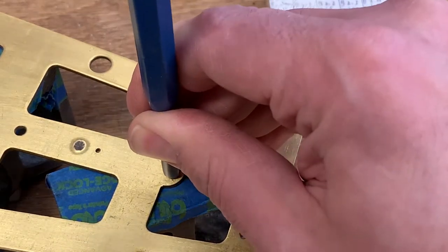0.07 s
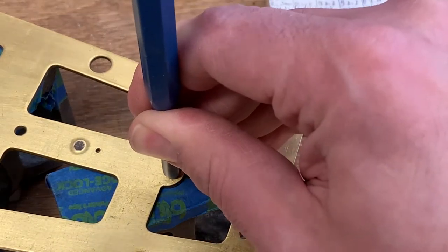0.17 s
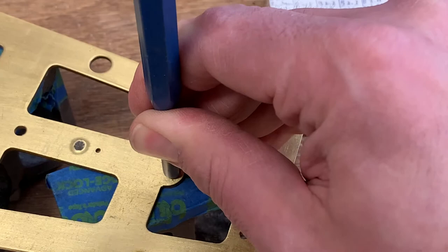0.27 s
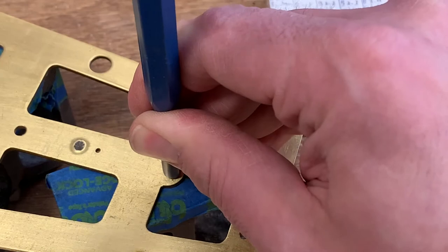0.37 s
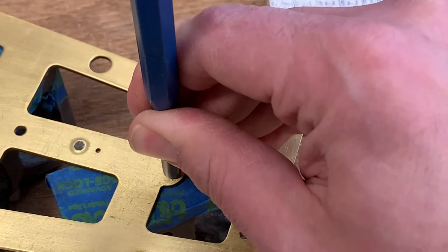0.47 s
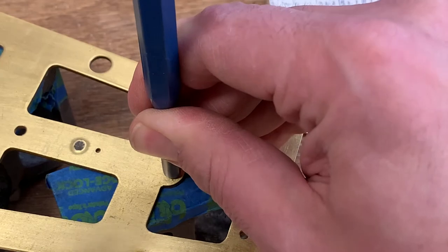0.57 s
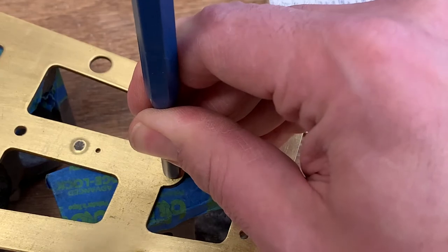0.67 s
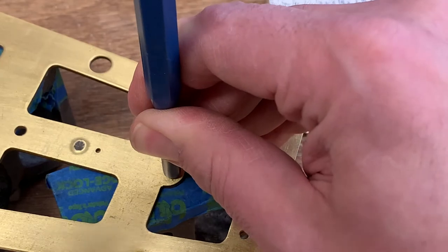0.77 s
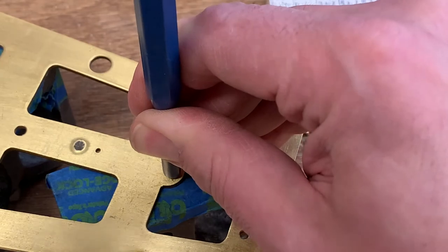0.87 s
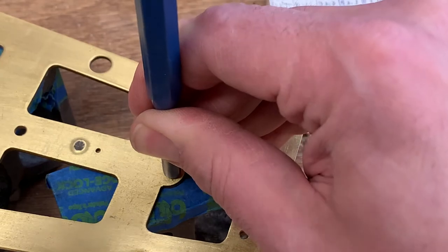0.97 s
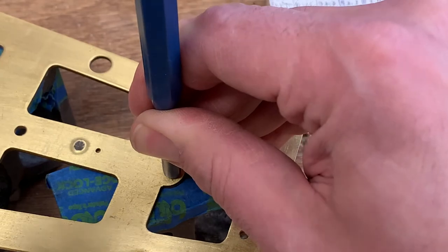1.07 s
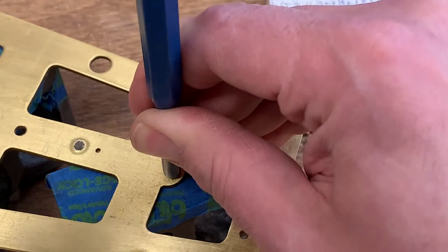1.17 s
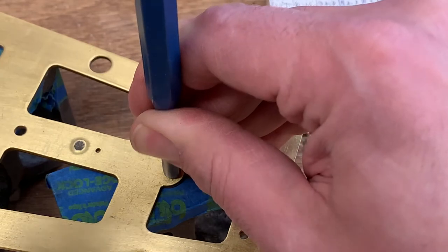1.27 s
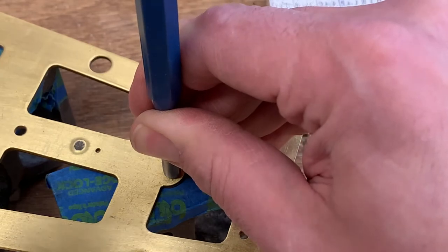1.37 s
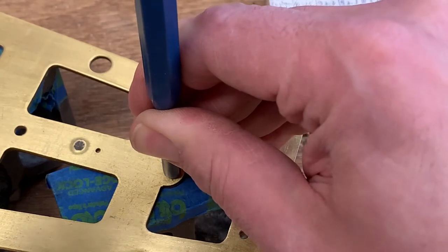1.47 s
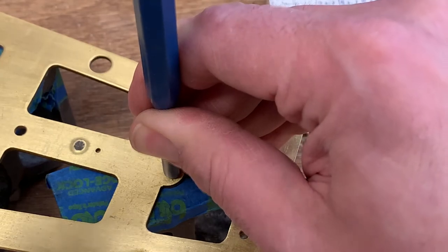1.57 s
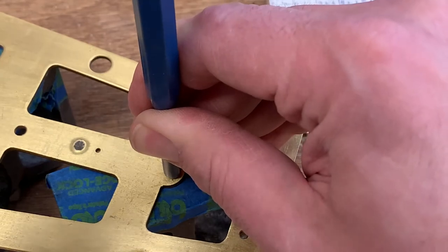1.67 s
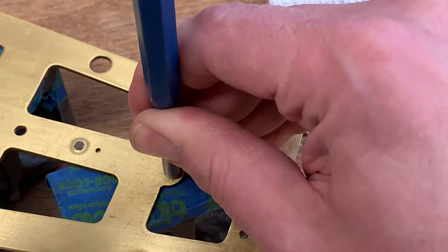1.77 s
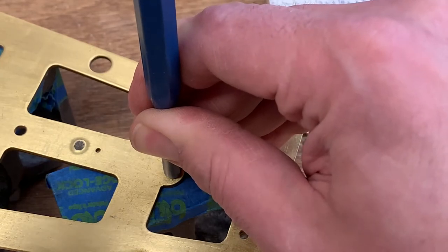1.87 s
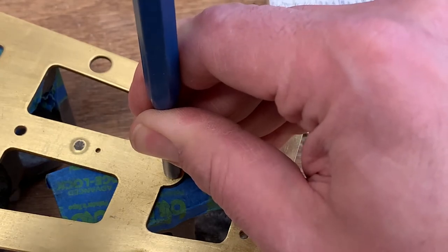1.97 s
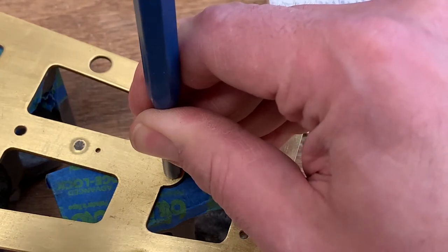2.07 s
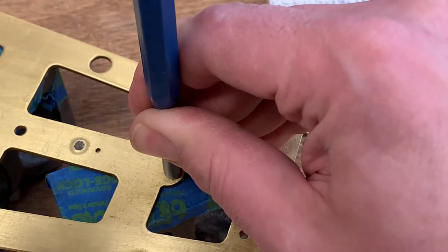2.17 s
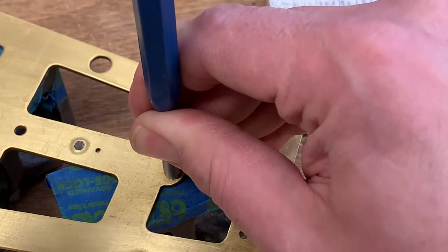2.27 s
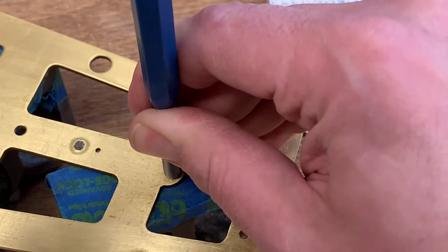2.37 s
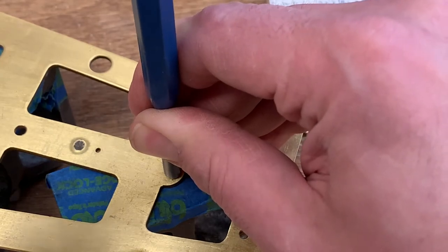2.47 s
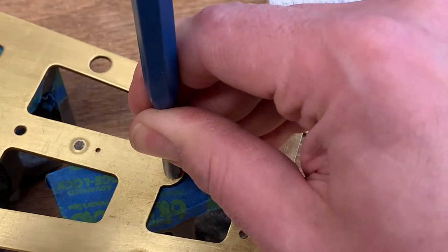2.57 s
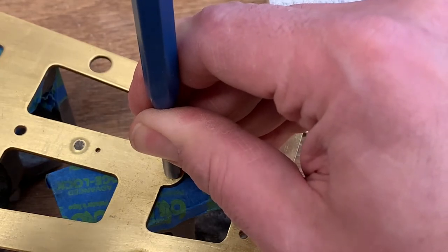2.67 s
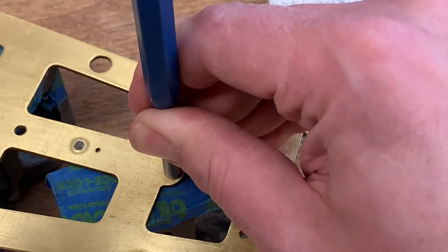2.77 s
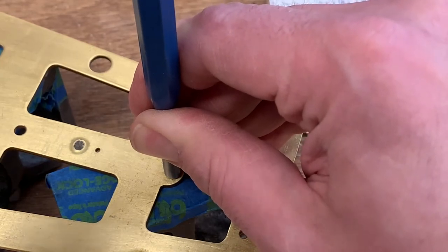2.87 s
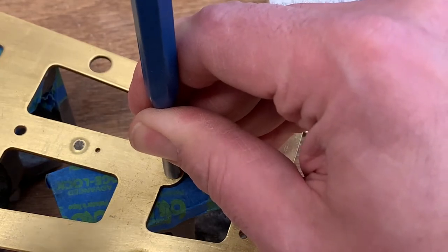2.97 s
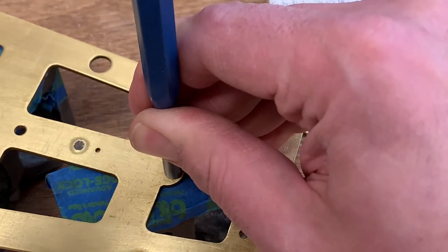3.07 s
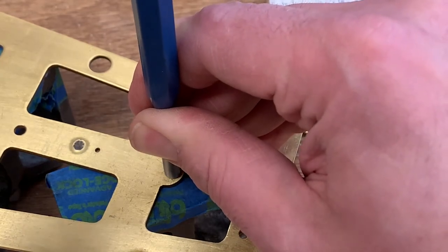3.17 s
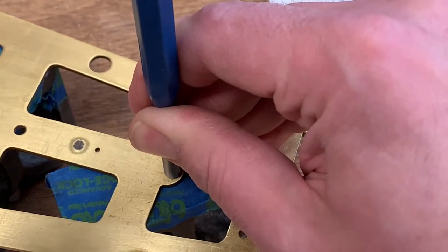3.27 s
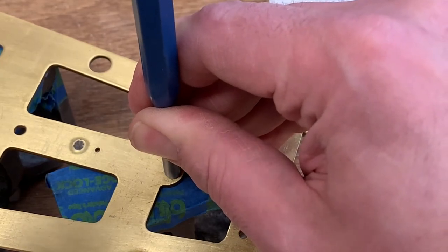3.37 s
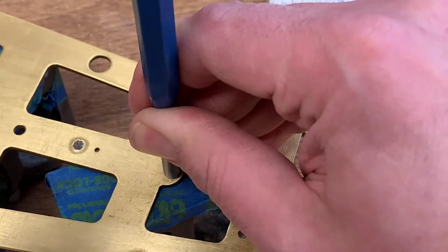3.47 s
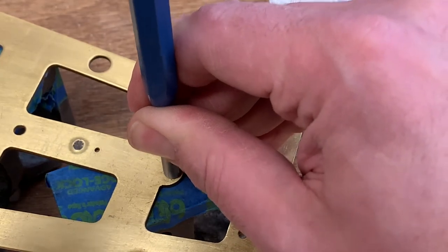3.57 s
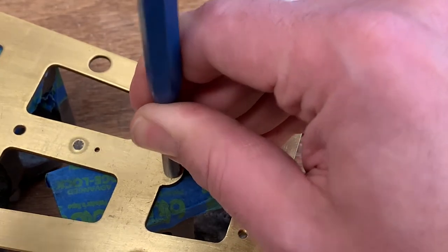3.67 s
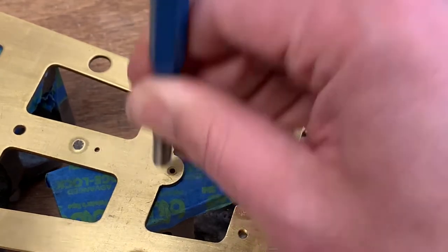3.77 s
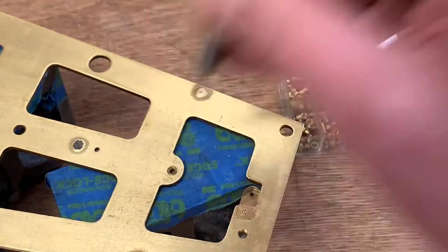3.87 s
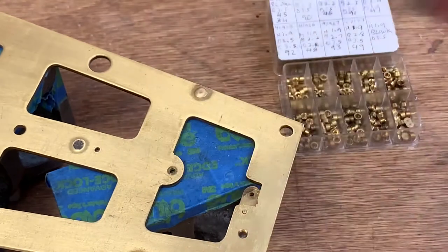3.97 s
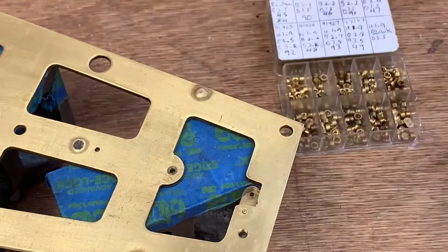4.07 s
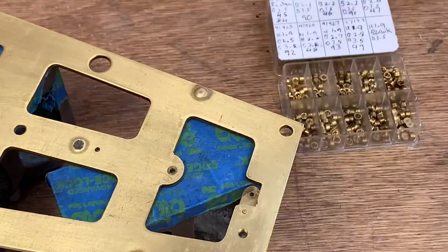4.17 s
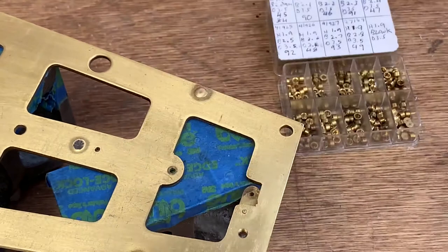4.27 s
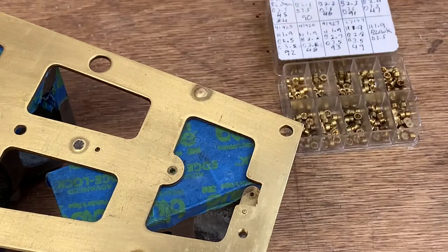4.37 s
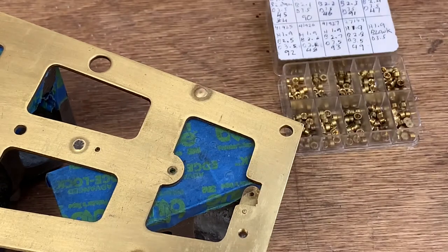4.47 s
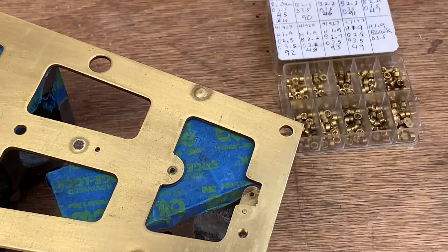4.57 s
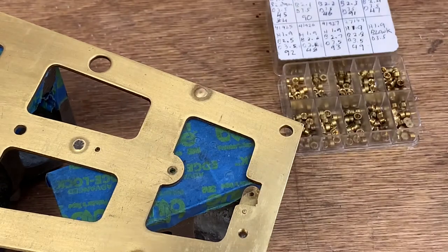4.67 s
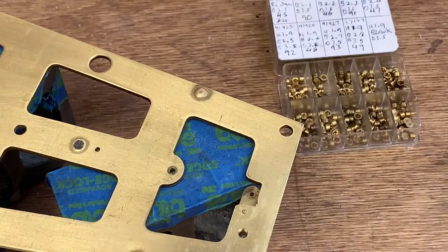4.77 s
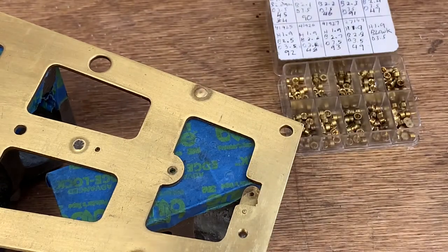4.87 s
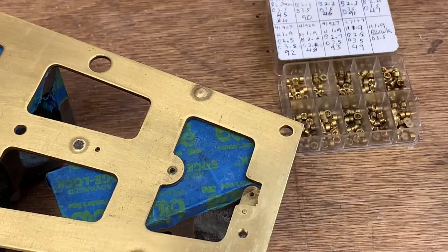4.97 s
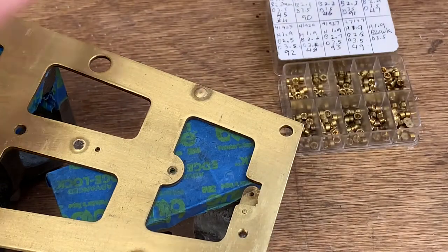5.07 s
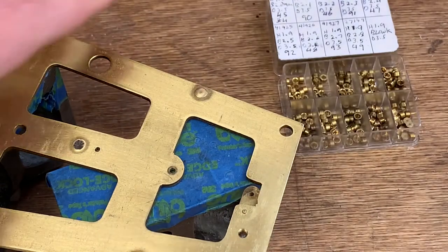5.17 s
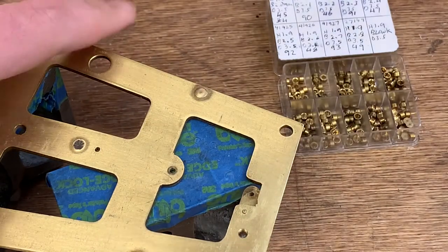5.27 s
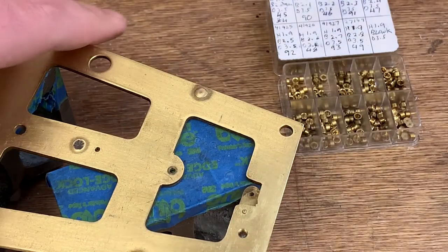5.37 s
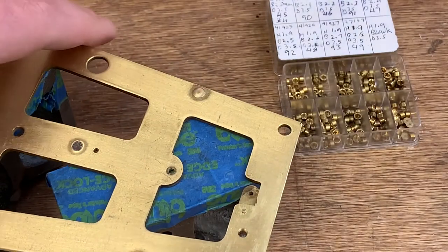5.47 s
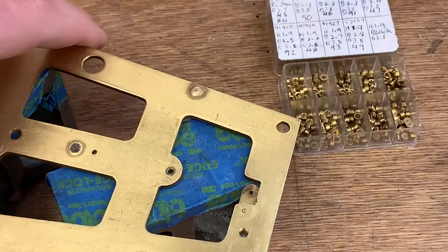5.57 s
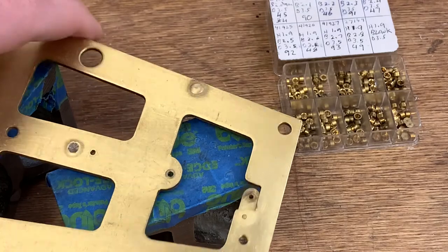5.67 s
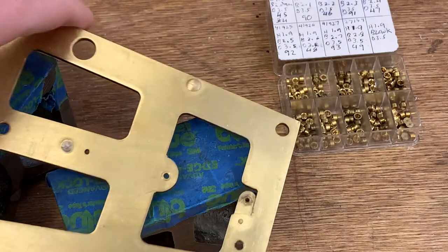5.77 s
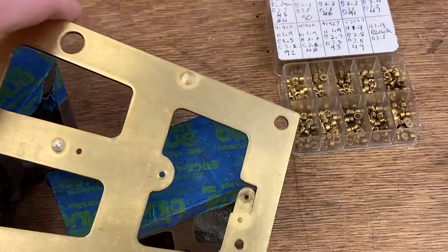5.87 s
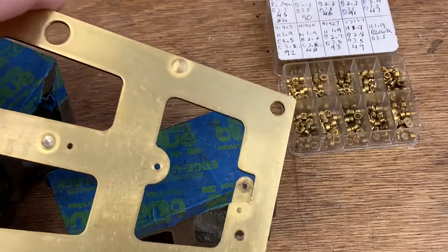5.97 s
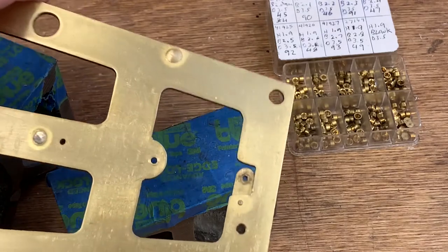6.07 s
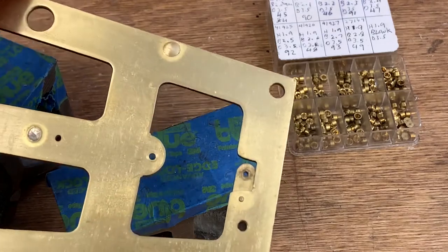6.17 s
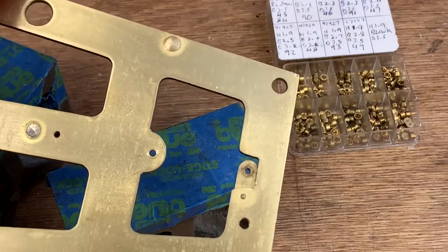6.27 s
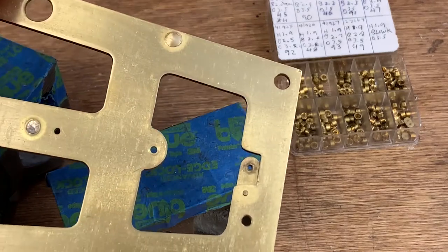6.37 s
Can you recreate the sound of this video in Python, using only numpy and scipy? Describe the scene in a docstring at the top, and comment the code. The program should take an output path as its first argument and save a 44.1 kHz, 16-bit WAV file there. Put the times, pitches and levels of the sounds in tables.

```python
"""A clock ticks faintly over rumble, hiss and hum; then nine hammer taps drive a bushing into a brass plate.
Each tap is coloured noise where steel cracks on a steel punch, and decaying modes of punch, plate and bench.
Then tools are put down, small brass parts jingle and the plate is shifted: noise bands with ringing bodies.
Decaying noise gives the echoes of the workshop. A close pair of microphones hears it through a limiter,
which lets the room swell up after each tap."""
import sys
import numpy as np
from scipy import signal
from scipy.fft import rfft, irfft
from scipy.io import wavfile
from scipy.ndimage import uniform_filter1d, minimum_filter1d

SR = 44100
rng = np.random.default_rng(int(sys.argv[2]) if len(sys.argv) > 2 else 0)


def wav_out(sig):
    """Save sig, one row per channel (or a flat mono array), as 16-bit PCM at SR to the path in sys.argv[1]."""
    wavfile.write(sys.argv[1], SR, np.round(np.clip(np.atleast_2d(sig).T, -1, 1) * 32767).astype(np.int16))


N = 282592
AGE = np.arange(SR) / SR  # time since a blow [s]
BINS = np.fft.rfftfreq(8192, 1 / SR)  # frequencies of a colour filter [Hz]
RATTLE_AFTER_S = 0.011  # loose metal first lands this long after a jolt

# hammer taps: (time [s], force [dB], steel crack re force [dB], plate ring re force [dB])
TAPS = [(0.9596, 0, 0, -2), (1.26, 4, -4.5, -9.5), (1.564, 4, -8, -8), (1.877, 5, -4.5, -11.5),
        (2.185, 4, -2.5, -8.5), (2.499, 1.5, -1, 1.5), (2.8187, 3.5, -0.5, -0.5), (3.1431, 7, -1.5, 5.5),
        (3.4496, 2, 2.5, 8.5)]
# likeness of left and right in echoes and background: (frequency [Hz], likeness [0-1])
LIKENESS = [(100, 0.98), (400, 0.8), (900, 0), (5000, 0.07), (6500, 0.6), (9000, 1)]


def amp(db):
    """Level law: decibels to an amplitude ratio."""
    return 10 ** (np.asarray(db) / 20)


def read(points, hz):
    """Spectral interpolation: values between points on a log-frequency axis."""
    f, value = np.transpose(points)
    return np.interp(np.log(hz + 1), np.log(f), value)


def add(mix, s, sound):
    """Superposition: a sound is summed into the mix from s seconds on."""
    part = mix[..., round(s * SR):][..., :sound.shape[-1]]
    part += sound[..., :part.shape[-1]]


def fade(t, t60):
    """Exponential decay: the amplitude falls by 60 dB in t60 seconds."""
    return np.exp(-np.log(1000) * t / t60)


def varied(modes, detune=0.0073, scatter_db=2):
    """Contact variability: no two contacts excite the modes quite alike."""
    return [(hz * (1 + detune * rng.normal()), db + scatter_db * rng.normal(), t60) for hz, db, t60 in modes]


def ring(modes):
    """Modal superposition: a struck body is a sum of decaying sines."""
    return sum(amp(db) * np.sin(2 * np.pi * hz * AGE) * fade(AGE, t60) for hz, db, t60 in modes)


def burst(colour_db, t60):
    """High modal density: countless short modes act as decaying noise through a causal colour filter."""
    log_gain = np.log(amp(np.maximum(colour_db, -100)))
    # minimum phase: the Hilbert transform of the log gain gives a causal filter
    mirrored = np.r_[log_gain, log_gain[-2:0:-1]]
    taps = np.fft.ifft(np.exp(signal.hilbert(mirrored).conj())).real
    noise = rng.standard_normal(SR) * fade(AGE, t60)
    # flatten the random spectrum but keep its phase, then scale to unit energy
    spectrum = rfft(noise)
    even = irfft(spectrum / (abs(spectrum) + 1e-12), SR) * fade(AGE, 4 * t60)
    even = even / np.linalg.norm(even)
    return signal.fftconvolve(even, taps[:len(taps) // 2])[:SR]


def band(middle_hz, octaves):
    """Band-pass response: gain of a steep-sided band."""
    low_hz, high_hz = middle_hz / 2 ** (octaves / 2), middle_hz * 2 ** (octaves / 2)
    return 1 / np.sqrt((1 + (low_hz / (BINS + 1)) ** 6) * (1 + (BINS / high_hz) ** 7))


def spread(x, delay_cycles=1.1, knee_hz=30):
    """Dispersion of bending waves in the bench top: the lower the note, the later it arrives."""
    hz = np.fft.rfftfreq(2 * SR, 1 / SR)
    phase = -2 * np.pi * delay_cycles * np.log(1 + hz / knee_hz)
    return irfft(rfft(x, 2 * SR) * np.exp(1j * phase))[:SR]


def pair(a, b, likeness):
    """Inter-channel coherence: two unrelated sounds become a partly alike left and right."""
    same = np.clip(read(likeness, np.fft.rfftfreq(len(a), 1 / SR)), 0, 1)
    right = irfft(same * rfft(a) + np.sqrt(1 - same ** 2) * rfft(b), len(a))
    return np.array([a, right])


def air(level_db=-57):
    """Stationary background: coloured Gaussian noise as low rumble and faint hiss, with steady hum tones."""
    # noise spectrum: (frequency [Hz], relative level [dB])
    noise_colour = [(15, -42), (25, -9), (43, -8), (64, 8.5), (92, -8.5), (123, 4.5), (153, -12.5),
                    (185, -7.5), (217, -13.5), (344, -21.5), (1130, -34), (7110, -47), (9070, -46),
                    (14400, -52), (16000, -65.5)]
    # mains hum: (frequency [Hz], RMS level [dB])
    hum_tones = [(59.2, -72), (119, -83)]
    gain = amp(read(noise_colour, np.fft.rfftfreq(N, 1 / SR)))
    noise = irfft(rfft(rng.standard_normal((2, N))) * gain, N)
    hum = 0
    for hz, db in hum_tones:
        cycles = hz * np.arange(N) / SR + rng.random()
        hum = hum + amp(db) * np.sqrt(2) * np.sin(2 * np.pi * cycles)
    return amp(level_db) * pair(*noise / noise.std(), LIKENESS) + hum


def tail(early_t60=0.24, build_s=0.00029):
    """Reverberant decay: early echoes off bench and shelves, and a long tail whose top treble dies first."""
    # late sound of the workshop: (frequency [Hz], level [dB])
    late_levels = [(60, -16), (150, -11.5), (260, -18.5), (350, -29), (420, -20.5), (510, -23), (700, -15),
                   (1300, -13), (2200, -14.5), (3500, -13), (5500, -14.5), (7000, -29), (10000, -17.5),
                   (15000, -24.5)]
    # its decay: (frequency [Hz], t60 [s])
    late_t60 = [(80, 0.71), (280, 0.87), (420, 2.1), (600, .9), (1150, 1.1), (1550, 0.74), (2600, 0.81),
                (4500, 0.68), (8000, 0.51), (14000, 0.047)]
    # early echoes: (frequency [Hz], level [dB])
    early_levels = [(100, -20), (400, -17), (1500, -8), (4000, -8), (7000, -21.5), (14000, -21)]
    noise = pair(*rng.standard_normal((2, 2 * SR)), LIKENESS)
    hz, t, z = signal.stft(noise, SR, nperseg=512)
    early = (read(early_levels, hz), np.full(len(hz), early_t60))
    late = (read(late_levels, hz), read(late_t60, hz))
    power = 0
    for db, t60 in [late, early]:
        # start power that makes each level the total energy of its decay
        start = amp(db) ** 2 * 2 * np.log(1000) / (t60 * SR)
        power = power + start[:, None] * fade(t, t60[:, None]) ** 2
    echoes = signal.istft(z * np.sqrt(power), SR)[1]
    age = np.arange(echoes.shape[1]) / SR
    return echoes * (1 - np.exp(-(age / build_s) ** 2))


def workshop(x, count=5):
    """Room convolution: several random echo patterns of the same workshop take turns from tap to tap."""
    starts = [tap[0] - .02 for tap in TAPS]
    turn = np.searchsorted(starts, np.arange(N) / SR) % count
    return sum(signal.fftconvolve((x * (turn == k))[None], tail(), axes=1)[:, :N] for k in range(count))


def clock(first_tick_s=.2235, tock_after_s=.476, tock_db=-4, t60=0.22, click_db=-2, rise_s=.0015):
    """Impulse and resonance: each beat of a clock across the room rings its case, its edge blurred by distance."""
    # click spectrum: (frequency [Hz], level [dB])
    click_colour = [(200, -22), (400, 4), (510, 7.5), (650, -2), (1100, 3.5), (1400, 4), (1650, 3.5),
                    (1950, 2), (2600, -8), (4000, -29.5), (6000, -37), (12000, -55.5)]
    # modes of the wooden case: (frequency [Hz], level re beat [dB], t60 [s])
    case_modes = [(510.7, -51, 0.34), (800, -46, 0.36), (1350, -44, 0.14), (1432, -40.5, .12),
                  (1522, -41, .08), (1730, -44.5, 0.12), (1860, -44.5, 0.14), (2020, -44.5, .08),
                  (2350, -45.5, 0.12), (3200, -60, 0.11)]
    # level of the clock: (time [s], level [dB])
    level_curve = [(.2, -11.5), (1.2, -5.5), (4.2, -15), (5.7, -16), (6.2, -18.5)]
    out = np.zeros((2, N))
    soft_edge = 1 - np.exp(-AGE / rise_s)
    for second in np.arange(first_tick_s, N / SR):  # one tick a second, a softer tock in between
        for s, db in [(second, 0), (second + tock_after_s, tock_db)]:
            beat = np.array([amp(click_db) * burst(read(click_colour, BINS), t60)
                             + spread(ring(varied(case_modes))) for side in range(2)])
            level_db = db + np.interp(s, *np.transpose(level_curve))
            add(out, s, amp(level_db) * soft_edge * beat)
    return out


def bumps(hz=60, length_s=0.05):
    """Soft excitation: the hand nudges the bench in slow, low swings that reach no treble."""
    # nudges: (time [s], level [dB])
    nudges = [(4.022, -43), (4.061, -38)]
    out, t = np.zeros(N), AGE[AGE < length_s]
    for s, db in nudges:
        add(out, s, amp(db) * np.sin(2 * np.pi * hz * t) * np.sin(np.pi * t / length_s))
    return out


def clicks(t60=0.038, slope_db_per_octave=28):
    """Resonant peak: light touches on metal give tiny dry clicks, each strongest near one pitch."""
    # touches: (time [s], level [dB], peak frequency [Hz])
    touches = [(4.951, -39, 7000), (5.177, -28, 4520), (5.348, -31.5, 3260)]
    out = np.zeros(N)
    for s, db, hz in touches:
        octaves_away = abs(np.log2((BINS + 1) / hz))
        add(out, s, amp(db) * burst(-slope_db_per_octave * octaves_away, t60))
    return out


def jingle(count=5, mean_wait_s=0.0073, landing_db=-3, fade_db_per_s=204, t60=0.068):
    """Random impacts: loose metal chinks at the jolt, is thrown up, and lands piece by piece."""
    # spectrum of one chink: (frequency [Hz], level [dB])
    chink_colour = [(2000, -5), (5000, -57.5), (6500, -20.5), (8000, -6.5), (11000, -14), (14200, -17),
                    (16000, -35)]
    out = burst(read(chink_colour, BINS), t60)
    for wait in mean_wait_s * rng.exponential(size=count):
        gain = amp(landing_db - fade_db_per_s * wait)  # later pieces land more softly
        add(out, RATTLE_AFTER_S + wait, gain * burst(read(chink_colour, BINS), t60))
    return out


def thud(contact_s=.00148):
    """Acceleration radiation: the bench modes start at full swing; the time of contact rounds off the blow."""
    # modes of the bench and its blocks: (frequency [Hz], level [dB], t60 [s])
    bench_modes = [(105, -35, .067), (123, -18, .139), (209, -13.5, .05), (269, -14.5, .07),
                   (351, -2, .042), (389, -16.5, .02), (444, -11, .08), (491, -10.5, .044),
                   (659, -10.5, .055), (808, -13, .04)]
    swing = sum(amp(db) * np.cos(2 * np.pi * hz * AGE) * fade(AGE, t60) for hz, db, t60 in bench_modes)
    push = np.sin(np.pi * AGE[AGE < contact_s] / contact_s) ** 2
    return np.convolve(swing, push / push.sum())[:SR]


def shudder(middle_hz=400, octaves=1.83, t60=0.3, thud_db=-36.5):
    """Structural reverberation: the bench top thuds and shudders on after a knock."""
    return amp(thud_db) * thud() + burst(20 * np.log10(band(middle_hz, octaves)), t60)


def knock(middle_hz, edge_db, thing, octaves=1.24, t60=0.056, contact_db=-2.5, body_db=-37, edge_hz=4200):
    """Contact stiffness: a harder edge reaches higher in a woody knock; the thing that lands rings briefly."""
    # what each thing rings with on the bench: thing: (frequency [Hz], relative level [dB], t60 [s])
    bodies = {"hammer": [(305, -3, 0.073), (426, 0, 0.084), (579, -4.5, 0.12), (856, -0.5, 0.029),
              (960, -4.5, 0.052), (1860, -19, 0.035)], "punch": [(328.7, -4, 0.065), (460, 1, .045),
              (558, 1.5, .04), (1242, 5, 0.029), (1420, 6, 0.045), (1552, -9, 0.052), (2334, -3.5, 0.037)],
              "handle": [(426.5, 3.5, 0.11), (586, -4, 0.043), (753, -1.5, 0.052), (1050, -10, 0.03),
              (1990, -7, 0.019)], "plate": [(327, -13.5, 0.18), (468, 0, 0.05), (770, 2.5, 0.072),
              (942, 5.5, 0.06), (1350, -12.5, .02), (1817, -3, 0.026), (2360, -10.5, .035)]}
    edge = amp(edge_db) / np.sqrt(1 + (BINS / edge_hz) ** 4)
    contact = burst(20 * np.log10(band(middle_hz, octaves) + edge), t60)
    body = spread(ring(varied(bodies[thing], detune=0.029, scatter_db=5.5)), delay_cycles=0.28)
    return amp(contact_db) * contact + amp(body_db) * body


def knocks(bounce_db=-11):
    """Impact and rebound: a tool or the plate lands and bounces once; the jolt makes metal rattle and ring."""
    # landings: (time [s], level [dB], middle frequency [Hz], hard edge [dB], bench shudder re level [dB],
    # bounce delay [s], jingle [dB], metal ring [dB], left-right [dB], thing)
    landings = [(4.3728, 8, 506, -26, -3, .0069, -22, -75, 4, "hammer"),
                (4.403, 3.5, 630, -34, 3, 0.0063, -48, -90, 5.5, "hammer"),
                (4.419, -3, 500, -36.5, -1, 0.0073, -48, -80, 6.5, "hammer"),
                (4.48, 19, 1210, -53, -2, 0.0078, 0.5, -48.5, 12.5, "hammer"),
                (4.5088, 13, 1300, -32, -3.5, .009, -16, -56.5, 5.5, "hammer"),
                (4.727, 8, 1100, -49.5, 3.5, .013, -7, -52, 11.5, "punch"),
                (5.036, 15, 660, -33.5, -0.5, 0.011, -8, -64, 7.5, "handle"),
                (5.092, -4, 448, -42, 8, 0.027, -42, -94.5, 6.5, "handle"),
                (5.9273, -4, 1330, -22, -9, .017, -16.5, -69.5, -5.5, "plate"),
                (6.301, 6, 810, -14.5, 1.5, 0.0041, -9, -58, 5, "plate")]
    # free ring of steel tools, and of the brass plate with its loose parts:
    # metal: (frequency [Hz], relative level [dB], t60 [s])
    metal_modes = {"steel": [(4130, -13.5, 0.21), (4260, -16.5, 0.28), (4930, -12.5, .28),
                   (4950, -10.5, 0.267), (7000, -13, 0.28), (8140, -4.5, .22), (7950, 1, .15),
                   (10500, -9.5, 0.13), (14100, -7, 0.11)], "brass": [(2520, 5, .08), (4100, 5, 0.086),
                   (4740, 2, 0.073), (7224, -7.5, .08), (9160, 10, 0.19), (10480, -10, .1),
                   (12700, -5, .06)]}
    out = np.zeros((2, N))
    for s, db, middle_hz, edge_db, shudder_db, bounce_s, jingle_db, ring_db, lean_db, thing in landings:
        place = amp([[lean_db / 2], [-lean_db / 2]])
        metal = "brass" if thing == "plate" else "steel"
        landing = place * knock(middle_hz, edge_db, thing) + amp(shudder_db) * shudder()
        add(out, s, amp(db) * landing)
        add(out, s + bounce_s, amp(db + bounce_db) * place * knock(middle_hz, edge_db, thing))
        add(out, s, amp(jingle_db) * jingle())
        for lag in (0, RATTLE_AFTER_S):
            add(out, s + lag, amp(ring_db) * ring(varied(metal_modes[metal])))
    return out


def hammer(thud_lag_s=0.00024, plate_lag_s=.0008, seat_s=0.0014, seat_db=-7, rebound_s=0.01, rebound_db=-19,
           crack_t60=0.063, crack_doubling_db=5, punch_db=-1, seated_loss_db=3.5, wood_t60=0.4):
    """Impact transmission: steel cracks and the punch rings; the blow passes through the plate to the bench."""
    # spectrum of the steel crack: (frequency [Hz], level [dB])
    crack_colour = [(100, 17.5), (500, 36.5), (1000, 19), (2100, 18.5), (3000, 9.5), (4000, 8), (5800, 7.5),
                    (7000, 22.5), (8500, 16.5), (10000, 14.5), (12000, 13.5), (14500, 11), (15500, 3.5),
                    (16600, -1)]
    # modes of the punch: (frequency [Hz], relative level [dB], t60 [s])
    punch_modes = [(7340, -9.5, 0.024), (7570, -8.5, 0.011), (7900, -20, 0.05), (8160, -19.5, 0.024),
                   (9554, -17.5, 0.036), (12100, -15.5, .012), (14100, -20.5, .012)]
    # modes of the brass plate, damped by the blocks: (frequency [Hz], relative level [dB], t60 [s])
    plate_modes = [(943, -23, 0.024), (1156, -28.5, 0.041), (1230, -23.5, 0.057), (1273, -30.5, 0.035),
                   (1411, -25.5, .04), (1453, -28, 0.1), (1924, -27.5, 0.11), (2285, -26.5, 0.07),
                   (4744, -22, 0.015)]
    # modes of bench frame and plate that the blocks hardly damp: (frequency [Hz], level re force [dB], t60 [s])
    linger_modes = [(78.5, -36, 0.75), (157.7, -36.5, .8), (1210, -64, .7), (1270, -58, .7),
                    (1500, -62, .45), (1715, -61, .4)]
    # the many weaker modes of the bench top: (frequency [Hz], level re force [dB])
    wood_colour = [(40, -11.5), (110, 10), (220, 15), (330, 16), (500, 15), (650, 13), (780, 9), (1000, 11),
                   (2000, -29.5), (6000, -43)]
    # the taps are louder on the left in the middle frequencies: (frequency [Hz], left-right [dB])
    balance = [(300, -.4), (550, 0), (800, 4), (1500, 5.5), (3000, 6.5), (5000, 3), (6500, .3),
               (14000, -.4)]
    out = np.zeros(N)
    bench = thud()
    for seated, (s, force_db, crack_db, plate_db) in zip(np.linspace(0, 1, len(TAPS)), TAPS):
        force, steel = amp(force_db), amp(force_db + crack_db)
        t60 = crack_t60 * 2 ** (crack_db / crack_doubling_db)  # a harder crack chatters longer
        # three contacts: hammer on punch, punch on bushing, plate dropping back on its blocks
        for lag, db, life in [(0, 0, t60), (seat_s, seat_db, t60), (rebound_s, rebound_db, .02)]:
            add(out, s + lag, steel * amp(db) * burst(read(crack_colour, BINS), life))
        # the punch rings less as the bushing seats
        punch_gain = amp(force_db + punch_db - seated_loss_db * seated ** 2)
        add(out, s, punch_gain * ring(varied(punch_modes, detune=0.014)))
        plate = amp(force_db + plate_db) * ring(varied(plate_modes, detune=0.0059))
        linger = force * ring(varied(linger_modes, detune=0.014))
        add(out, s + plate_lag_s, plate + linger)
        add(out, s + thud_lag_s, force * spread(bench + burst(read(wood_colour, BINS), wood_t60)))
    lean_db = read(balance, np.fft.rfftfreq(N, 1 / SR)) / 2
    return irfft(rfft(out) * amp([lean_db, -lean_db]), N)


def scene(handling_room_db=-1, left_lag_s=.000211):
    """Superposition and time difference: all sources sum, and the left channel comes a moment late."""
    taps, handling, ticks = hammer(), knocks() + clicks(), clock()
    echoes = workshop((taps + amp(handling_room_db) * handling + ticks).mean(0))
    left, right = taps + handling + ticks + bumps() + echoes + air()
    late = np.exp(-2j * np.pi * np.fft.rfftfreq(N, 1 / SR) * left_lag_s)
    return np.array([irfft(rfft(left) * late, N), right])


def tone(x, low_cut_hz=38):
    """Linear-phase filtering: a low cut and a few narrow dips change level without shifting phase."""
    # dips: (centre [Hz], width [Hz], depth [dB])
    dips = [(412, 70, -6), (612, 70, -6), (770, 80, -7), (950, 110, -6)]
    hz = np.fft.rfftfreq(N, 1 / SR)
    dips_db = sum(db / (1 + (2 * (hz - centre) / width) ** 2) for centre, width, db in dips)
    return irfft(rfft(x) * amp(dips_db) * hz / np.hypot(hz, low_cut_hz), N)


def record(dry, limit_db=-10.0, hold_s=0.054, release_db_per_s=80, edge_hz=16500):
    """Dynamic range control: a look-ahead limiter clamps each tap, holds and lets go; then the band limit."""
    t, dry = np.arange(N) / SR, tone(dry)
    power_db = 10 * np.log10(abs(uniform_filter1d((dry ** 2).mean(0), size=220)) + 1e-12)
    # the running peak falls back at the release rate
    fall = release_db_per_s * t
    peak_db = np.maximum.accumulate(power_db + fall) - fall
    over_db = np.maximum(peak_db - limit_db, 0)
    held_db = np.maximum(over_db, np.interp(t - hold_s, t, over_db))
    # the centred minimum looks ahead, the mean smooths the gain
    gain_db = uniform_filter1d(minimum_filter1d(-held_db, size=300), size=120)
    limited = np.clip(dry * amp(gain_db), -.92, .92)
    low_pass = signal.firwin(255, edge_hz, window=("kaiser", 9), fs=SR)
    return signal.oaconvolve(limited, low_pass[None], "same")


dry = scene()
out = record(dry)
wav_out(out)
```